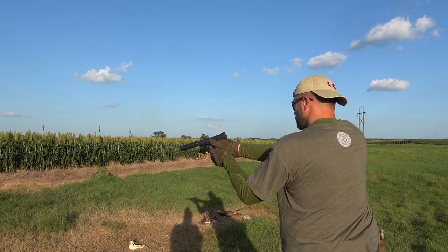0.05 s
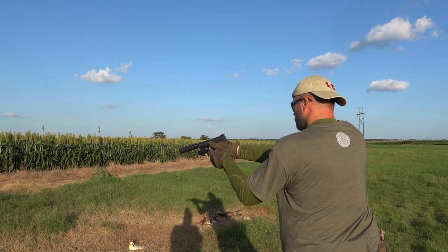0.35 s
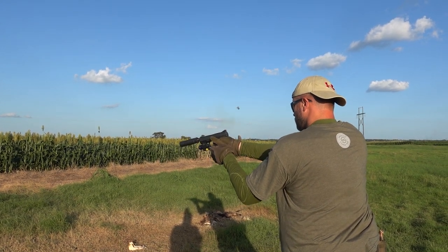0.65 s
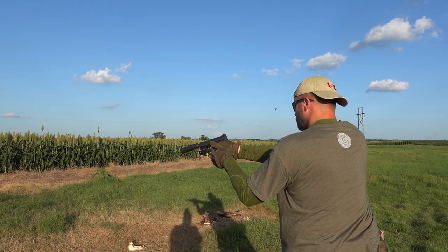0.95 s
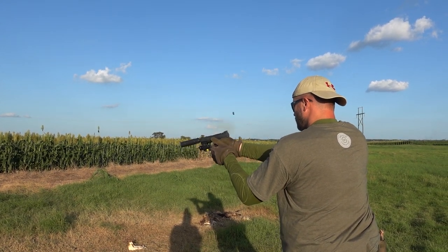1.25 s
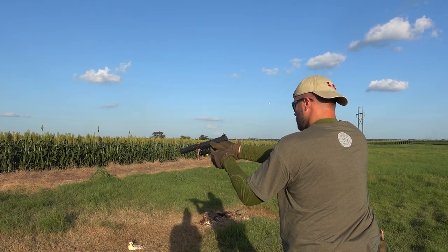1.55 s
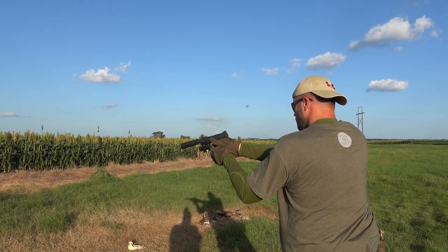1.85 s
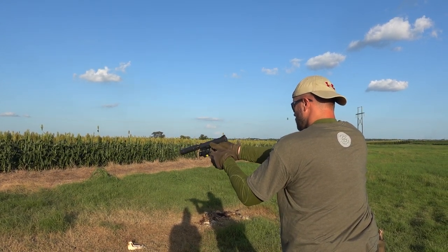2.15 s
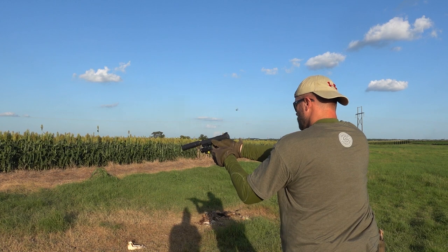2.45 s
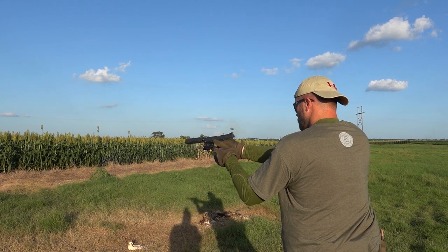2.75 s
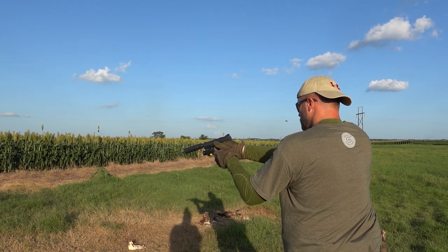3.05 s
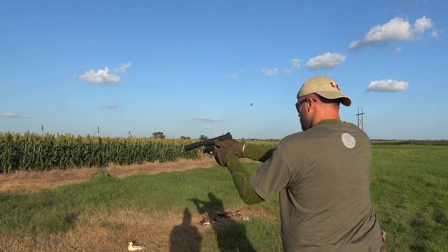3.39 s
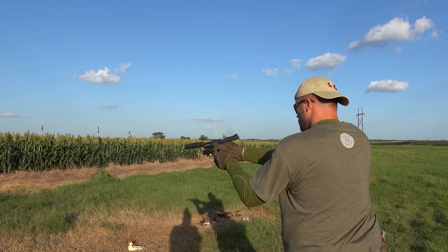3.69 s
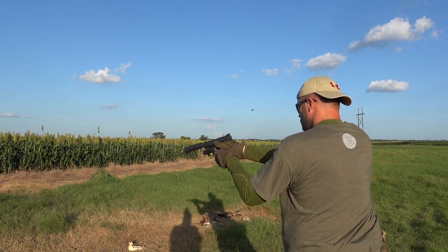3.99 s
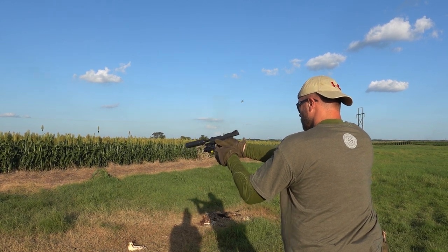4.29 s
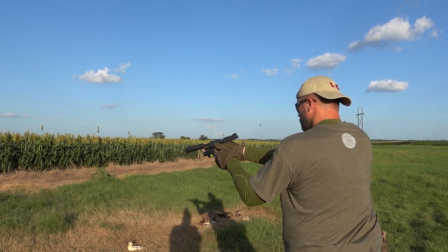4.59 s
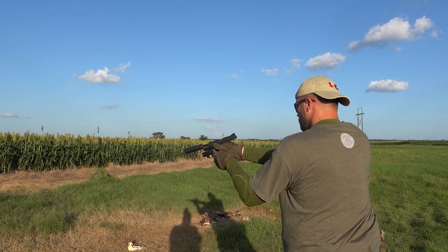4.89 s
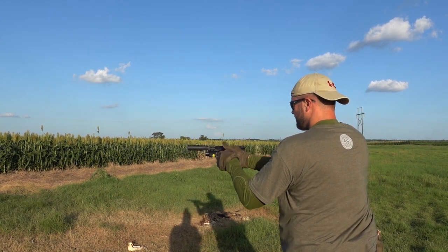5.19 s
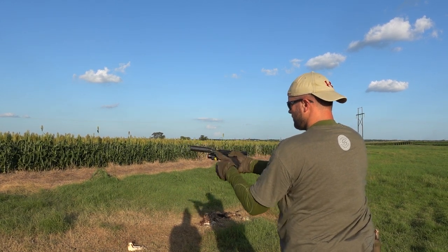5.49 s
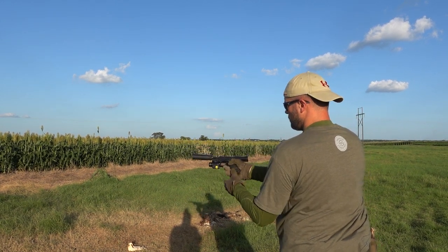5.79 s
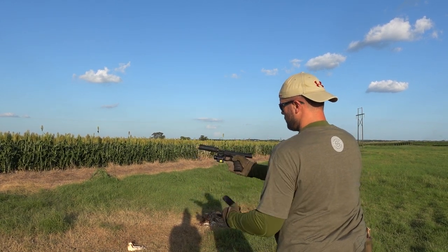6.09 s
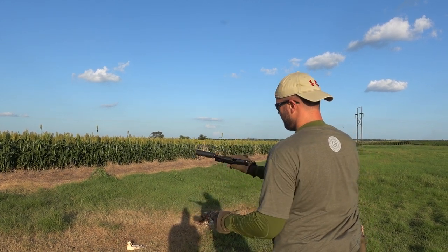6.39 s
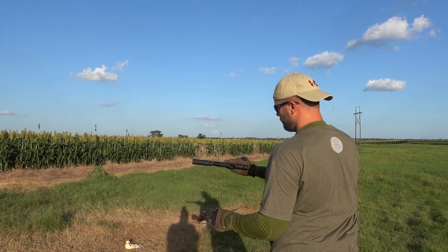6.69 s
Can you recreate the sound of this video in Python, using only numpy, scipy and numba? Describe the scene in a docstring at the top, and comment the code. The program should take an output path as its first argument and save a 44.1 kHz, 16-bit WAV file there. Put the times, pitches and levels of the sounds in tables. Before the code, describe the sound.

A suppressed pistol fires eight quick shots in an open field, each echoing, followed by handling clicks, birds and crickets.

```python
"""A suppressed pistol fires eight shots beside a cornfield, close to a mono microphone, then is handled.
Each blast overloads the microphone and the slide cycles. The rows of corn return a pitched, falling
echo and the far edge of the field a late hiss; an earlier shot's echo is still dying at the start.
Wind rumbles on the microphone, bush crickets chirp near and far, and birds whistle across the field."""
import sys
import numpy as np
from scipy import signal
from scipy.fft import rfft, irfft, next_fast_len
from scipy.io import wavfile
from scipy.ndimage import uniform_filter1d
from numba import njit

SR = 44100
rng = np.random.default_rng(int(sys.argv[2]) if len(sys.argv) > 2 else 0)


def waveform_to_disk(signal):
    """Save audio, clipped to [-1, 1], as 16-bit WAV at the path in sys.argv[1]."""
    frames = np.transpose(np.atleast_2d(signal))
    scaled = np.clip(frames, -1, 1) * 32767
    samples = np.round(scaled).astype(np.int16)
    wavfile.write(sys.argv[1], SR, samples)


N = 297234
TIME = np.arange(N) / SR
AGE = TIME[:SR]  # the second that follows an event
CORN_DELAY_S = .0545  # out to the front row and back to the microphone


def undb(db):
    """Decibels to gain."""
    return 10 ** (np.asarray(db) / 20)

def unit(x):
    """Scale to rms 1."""
    return x / np.sqrt(np.mean(x ** 2))

def colour(x, spectrum):
    """Filter x by a spectrum of (freq_hz, gain_db) points, at rms 1."""
    hz, db = np.transpose(spectrum)
    size = next_fast_len(len(x))
    f = np.maximum(np.fft.rfftfreq(size, 1 / SR), 1)
    gain = undb(np.interp(np.log(f), np.log(hz), db))
    return unit(irfft(rfft(x, size) * gain, size)[:len(x)])

def noise(spectrum, size=SR):
    """Coloured noise of rms 1."""
    return colour(rng.standard_normal(size), spectrum)

def rattle(modes):
    """Dense contacts ringing resonances of (pitch_hz, width_hz, gain_db), at rms 1."""
    f = np.fft.rfftfreq(SR, 1 / SR)
    response = sum(undb(db) / (1 + 2j * (f - hz) / width) for hz, width, db in modes)
    return unit(irfft(rfft(rng.standard_normal(SR)) * response))

def burst(peak_s, rise_s, decay_s):
    """Envelope that grows to 1 at peak_s and dies away."""
    return np.exp(np.maximum(np.minimum((AGE - peak_s) / rise_s, (peak_s - AGE) / decay_s), -50))

def bump(t, centre, width):
    """A smooth hump of height 1."""
    return np.exp(-np.minimum(((t - centre) / width) ** 2, 50))

def walk(rate_hz):
    """Smooth random drift, spread near 1."""
    knots = rng.standard_normal(1024)
    return np.interp(TIME * rate_hz, np.arange(len(knots)), knots)

def add(out, start_s, x):
    """Mix x into out from start_s on."""
    i = int(round(start_s * SR))
    a, b = max(i, 0), min(i + len(x), len(out))
    out[a:b] += x[a - i:b - i]

@njit
def resonance(x, hz, width):
    """Band-pass whose centre moves every sample."""
    y, band_state, low_state = np.empty(len(x)), 0., 0.
    for i in range(len(x)):
        g, damping = np.tan(np.pi * hz[i] / SR), width / hz[i]
        band = (band_state + g * (x[i] - low_state)) / (1 + g * (g + damping))
        band_state, low_state = 2 * band - band_state, low_state + 2 * g * band
        y[i] = damping * band
    return y

def air(wind_db=14):
    """Gusts buffet the microphone over the faint hiss of the open field."""
    # spectra of the wind and the field: freq_hz, gain_db
    rumble = [(2, -39.5), (7, 8.5), (12, 6), (20, -2), (40, -21), (80, -29), (140, -34.5), (300, -56.5),
              (800, -66)]
    field = [(100, 3.5), (300, 3.5), (550, 3.5), (1000, 1.5), (2500, -2.5), (7000, -12), (9500, -3),
             (11500, -18.5), (14000, -1), (16000, -8.5)]
    # their rise and fall: time_s, gain_db
    gusts = [(0, -29.5), (.9, -28), (1.5, -28.5), (2.3, -31), (3.1, -29.5), (3.9, -26), (4.75, -37),
             (5.7, -32.5), (6.4, -29.5), (6.74, -36)]
    hush = [(0, -48.5), (4.3, -55.5), (4.9, -55.5), (5.6, -53.5), (6.74, -51)]
    wind = noise(rumble, N) * undb(wind_db + np.interp(TIME, *np.transpose(gusts)))
    wind = .35 * np.tanh(wind / .35)  # the breeze stays light
    hiss = noise(field, N) * undb(np.interp(TIME, *np.transpose(hush)) + .54 * walk(.62))
    return wind + hiss

def chirp(hz, length_s, stroke_hz=140, sweep=.017, rasp=.0462):
    """A cricket's train of wing strokes, each a short, rough, falling tone."""
    t = AGE[:int(length_s * SR)]
    stroke = t * stroke_hz % 1
    pitch = hz * (1 + sweep * (.5 - stroke) + rasp * rng.standard_normal(len(t)))
    envelope = np.sin(np.pi * stroke) * signal.windows.tukey(len(t), .4)
    return envelope * np.sin(2 * np.pi * np.cumsum(pitch) / SR)

def crickets(near_db=-44, tiring_db_per_s=-.94, chorus_db=-53, fade_db_per_s=-2.4):
    """One bush cricket near the microphone, two further off, and a fading hiss of distant ones."""
    # bouts of the nearest: start_s, end_s, period_s
    bouts = [(.225, 4.5, .156), (4.69, 5.25, .166), (5.46, 6.72, .154)]
    chorus = noise([(10000, -29.5), (12500, -8), (14200, -2.5), (16000, -8.5)], N)
    out = chorus * undb(chorus_db + fade_db_per_s * TIME)
    for first, last, period_s in bouts:
        for start in np.arange(first, last, period_s):
            add(out, start, undb(near_db + tiring_db_per_s * start) * chirp(hz=9620, length_s=.053))
    for hz, period_s in [(10350, .185), (9350, .16)]:
        for start in np.cumsum(period_s * (1 + .063 * rng.standard_normal(48))):
            add(out, min(start, TIME[-1]), undb(-54) * chirp(hz, length_s=.055))
    return out

def birds(settle=3.2, waver_db=1.5, wet_db=-13, ring_s=.088):
    """Pure whistles that glide, mostly down, and level off, ringing on a little across the field."""
    # calls: start_s, length_s, first_hz, last_hz, level_db
    whistles = [(4.659, 0.14, 5200, 5270, -54), (4.836, 0.2, 4560, 3780, -39.5),
                (5.406, 0.11, 5500, 4900, -54), (5.52, 0.093, 5270, 4750, -62),
                (6.025, 0.19, 5120, 5200, -56), (6.152, 0.27, 4780, 3664, -38),
                (6.263, 0.09, 5540, 5430, -40.5), (6.33, .06, 5350, 4700, -58),
                (6.376, 0.22, 4880, 3680, -35.5), (6.63, 0.095, 4430, 3900, -57)]
    out = np.zeros(N)
    for start, length, first_hz, last_hz, db in whistles:
        progress = np.linspace(0, 1, int(length * SR))
        hz = last_hz + (first_hz - last_hz) * (1 - progress) ** settle
        tone = np.sin(2 * np.pi * np.cumsum(hz) / SR)
        add(out, start, undb(db) * np.sin(np.pi * progress) ** 2 * tone)
    tail = rng.standard_normal(SR) * np.exp(-AGE / ring_s)
    reverb = signal.fftconvolve(out, tail / np.linalg.norm(tail))[:N]
    return out * undb(waver_db * walk(40)) + undb(wet_db) * reverb

def far_edge(db=-31.5, delay_s=.3615, beyond_db=-53, beyond_s=.49, sizzle_hz=7000):
    """The far edge of the field returns a late, sizzling hiss; a weaker return comes from beyond."""
    sizzle = undb(-10) * rattle([(sizzle_hz * rng.uniform(.92, 1.08), 450, 0)])
    # spectrum of the distant echo: freq_hz, gain_db
    hiss = [(300, -35.5), (800, -3.5), (2000, -4.5), (4000, -3), (5600, 2.5), (7200, -0.5), (8300, -6),
            (12000, -12.5), (16000, -33.5)]
    edge = undb(db) * burst(delay_s, .064, .024) * bump(AGE, delay_s, .062)
    beyond = undb(beyond_db) * burst(beyond_s, .025, .04)
    return (noise(hiss) + sizzle) * (edge + beyond)

def sustain(db, swell_db, release_s, tail_db, tail_s, hold_s=.073, attack_s=.003):
    """Envelope of the corn's echo: it swells as more rows answer, then dies into a faint tail."""
    late = np.maximum(AGE - CORN_DELAY_S, 0)
    attack = np.clip(1 + (AGE - CORN_DELAY_S) / attack_s, 0, 1) ** 2
    swell = undb(db + swell_db * np.minimum(late / hold_s - 1, 0))
    release = np.exp(-np.maximum(late - hold_s, 0) / release_s)
    return attack * np.hypot(swell * release, undb(tail_db) * np.exp(-late / tail_s))

def foliage(glint, air_hz=7000, dulling_s=.22, ground_gain=.38, ground_lag_s=.00114):
    """Hissing echo of near and far leaves; they sway, so it is new for each shot."""
    # spectrum off the leaves: freq_hz, gain_db
    hiss = [(200, -18.5), (700, -7.5), (1500, 1), (2200, -5), (3000, -3.5), (3700, -3), (5200, 0.5),
            (6900, -4.5), (8500, -2.5), (11000, -12.5), (15500, -15.5)]
    leaves = noise(hiss)
    # a second path by way of the ground combs the spectrum; its lag shrinks with distance
    lag = ground_lag_s * rng.uniform(.73, 1.4) * CORN_DELAY_S / np.maximum(AGE, CORN_DELAY_S)
    leaves = unit(leaves + ground_gain * np.interp(AGE - lag, AGE, leaves))
    # air takes the top off the longer paths
    dull = signal.sosfilt(signal.butter(2, air_hz, fs=SR, output="sos"), noise(hiss))
    bright = bump(AGE, 0, dulling_s)
    leaves = np.sqrt(bright) * leaves + np.sqrt(1 - bright) * dull
    front_row = undb(-8) * burst(CORN_DELAY_S, .001, .0035)
    lone_reflector = undb(-27) * burst(.214, .0012, .00093)
    rows = sustain(db=-20, swell_db=4.5, release_s=.066, tail_db=-23, tail_s=.12)
    return glint * leaves * (front_row + rows + lone_reflector)

def stalk_echoes(edge_m=8.75, row_gap_m=.962, stalk_gap_m=.185, stray_m=.028, row_loss_db=-.5):
    """One reflection per stalk: even rows buzz near 180 Hz, even stalks whistle down toward 900 Hz."""
    row, stalk = np.mgrid[:40, :700]
    chance = rng.standard_normal((3,) + row.shape)
    across = edge_m + row * row_gap_m + stray_m * chance[0]
    along = (stalk - 12 + rng.random((len(row), 1))) * stalk_gap_m + stray_m * chance[1]
    distance = np.hypot(across, along)
    strength = undb(row_loss_db * row) * (1 + .49 * chance[2]) / distance ** 2
    arrival = (.003 + 2 * distance / 345) * SR  # out and back at 345 m/s
    return np.bincount(arrival.astype(int).ravel(), strength.ravel(), SR)[:SR]

def corn(whistle_db=9, first_hz=2300., last_hz=800., fall_s=.028, whistle_s=.085):
    """Echo of the stalks; the front rows whistle downward as the sound grazes along them."""
    # spectrum off the stalks: freq_hz, gain_db
    spectrum = [(100, -3.5), (180, -8.5), (270, -6), (360, -8), (450, -6.5), (560, 0.5), (800, 3.5),
                (1400, 3.5), (2100, -6.5), (3200, -11), (8000, -48)]
    stalks = colour(stalk_echoes(), spectrum)
    late = np.maximum(AGE - CORN_DELAY_S, 0)
    whistle_hz = last_hz + (first_hz - last_hz) * np.exp(-late / fall_s)
    whistle = resonance(stalks, whistle_hz, width=330.)
    stalks += undb(whistle_db) * bump(late ** 2, 0, whistle_s ** 2) * whistle
    levelled = stalks / np.sqrt(np.abs(uniform_filter1d(stalks ** 2, size=900)) + 1e-12)
    front_row = undb(-15) * burst(CORN_DELAY_S, .001, .0026)
    rows = sustain(db=-14, swell_db=6.5, release_s=.041, tail_db=-34, tail_s=.18)
    far_slap = noise(spectrum) * undb(-35) * burst(.359, .0029, .01)
    return levelled * (front_row + rows) + far_slap

def click(steel_db, frame_db, decay_s, ring_db=-24, ring_s=.019):
    """A small part strikes home and rings the gun's steel and frame."""
    # resonances: pitch_hz, width_hz, gain_db
    steel = [(1800, 180, -4.5), (2440, 230, 20), (2900, 490, 19), (4700, 1800, 13), (5540, 280, -6),
             (8000, 700, -33), (8980, 900, -50)]
    frame = [(575, 83, -11.5), (1120, 490, 24), (1600, 200, 4)]
    envelope = burst(.00038, .00054, decay_s) + undb(ring_db) * burst(.00053, .0003, ring_s)
    return envelope * (undb(steel_db) * rattle(steel) + undb(frame_db) * rattle(frame))

def handling(grip_hz=540, rough_db=4, fidget_from_s=4.65, fidget_to_s=6.5, ticks_per_s=4):
    """Close by, the magazine scrapes out, small parts click, and hands knock and shift on the gun."""
    # a glove rubs the grip, the magazine slides out and comes free: start_s, length_s, level_db
    scrapes = [(5.477, 0.12, -55), (5.877, 0.17, -44.5), (6.126, 0.034, -48), (6.437, 0.036, -49)]
    # spectrum of the rubbing: freq_hz, gain_db
    friction = [(300, -11), (900, -10), (3000, -2), (8000, -3), (11000, -15), (16000, -12.5)]
    # trigger reset, catch and magazine: start_s, steel_db, frame_db, decay_s
    clicks = [(0.2911, -31, -13.5, 0.0019), (1.2164, -38, -13, 0.0024), (4.7957, -32, -24.5, 0.0027),
              (5.0406, -45, -60, 0.0014), (5.0655, -45, -64, 0.0024), (5.1517, -42, -45, .009),
              (5.6507, -47, -66, 0.0026), (5.8846, -22, -27, 0.0064), (5.962, -38, -33, 0.0018),
              (6.021, -52, -31, .0034), (6.356, -34, -48, .0014), (6.393, -38.5, -37, 0.0013)]
    # dull knocks on the grip: start_s, level_db
    knocks = [(4.188, -44), (4.636, -55), (4.727, -48), (5.153, -35), (5.887, -34), (6.023, -61)]
    rubbing = np.zeros(N)
    for start, length, db in scrapes:
        add(rubbing, start, undb(db) * signal.windows.tukey(int(length * SR), .3))
    out = rubbing * noise(friction, N) * undb(rough_db * walk(140))
    for start, steel_db, frame_db, decay_s in clicks:
        add(out, start, click(steel_db, frame_db, decay_s))
    for start, db in knocks:
        add(out, start, undb(db) * burst(.0081, .002, .013) * rattle([(grip_hz, 160, 0)]))
    ticks = int(ticks_per_s * (fidget_to_s - fidget_from_s))
    for start in rng.uniform(fidget_from_s, fidget_to_s, ticks):
        add(out, start, click(steel_db=-49, frame_db=-57, decay_s=.0022))
    return out

def trigger(frame_db=-5, slack_db=-8, slack_s=.016):
    """Each pull takes up the slack with a faint tick, then the sear clicks just before the shot."""
    # sear clicks: start_s, level_db
    pulls = [(.624, -18.5), (1.2314, -26), (1.802, -21.5), (2.276, -34), (2.7863, -26.5), (3.274, -30),
             (3.7522, -24), (4.208, -23.5)]
    out = np.zeros(N)
    for start, db in pulls:
        add(out, start - slack_s, click(db + slack_db, db + slack_db + frame_db, decay_s=.00076))
        add(out, start, click(db, db + frame_db, decay_s=.00059))
    return out

def shot(blast_db, wave_db, gas_db, stop_db, shut_db, blast_s=.0033, suction_s=.007, gas_s=.01):
    """Striker, blast, gas leaving the suppressor, the slide's rear stop and closing, grass scatter."""
    # spectra of muzzle blast, gas and slide: freq_hz, gain_db
    muzzle = [(100, -28.5), (400, 3.5), (1200, 7), (2500, 3), (6000, 4.5), (9000, 6), (15000, -13.5)]
    vent = [(150, 0.5), (600, -0.5), (1500, 0.5), (2500, -5), (5000, -2), (8500, -3), (11000, -10),
            (16000, -6)]
    slide = [(200, -2.5), (700, -0.5), (2500, 5.5), (4500, 10), (7000, -1.5), (15000, -5.5)]
    # resonances of the closing slide: pitch_hz, width_hz, gain_db
    slide_ring = [(4360, 3400, -24), (6240, 580, -17.5), (8100, 330, -5), (8750, 450, -33),
                  (14800, 1600, -21.5)]
    striker = noise(slide) * undb(-9.5) * burst(.0012, .00024, .0013)
    blast = noise(muzzle) * undb(blast_db + 15) * burst(blast_s, .00015, .0015)
    gas = noise(vent) * undb(gas_db - 5.5) * burst(gas_s, .002, .0085)
    stop = noise(slide) * undb(stop_db - 1) * burst(.0262, .0008, .0011)
    shut = rattle(slide_ring) * undb(shut_db) * burst(.0467, .0005, .0013)
    grass = noise(vent) * undb(-19.5) * burst(.035, .014, .041)
    # the blast's pressure falls into suction, then rebounds
    pressure = .7 * bump(AGE, blast_s, .001) - 1.8 * bump(AGE, suction_s, .0018)
    pressure += 1.2 * bump(AGE, gas_s, .0012)
    # a strong wave also leaves the suppressor with a hollow thump
    thump = rattle([(310, 130, 0)]) * undb(2 * wave_db - 5) * burst(suction_s, .0012, .0065)
    return striker + blast + gas + stop + shut + grass + thump + undb(wave_db) * pressure

def pistol(near_echo_s=.11, far_echo_s=.2, puff_half_width_s=.009):
    """Close shots and their echoes, which shift from the far rows to the near as the firing goes on."""
    # shots, each part's level relative; the slide stays open after the last round:
    # start_s, blast_db, wave_db, gas_db, stop_db, shut_db, near_db, far_db
    shots = [(-.286, 0, 0, 0, 0, 0, 0, 7), (.642, 5.5, -5, 2, 6, -2, 1, 6),
             (1.264, 4, -5.5, 3.5, 7.5, -9.5, -1, 4), (1.8215, 11.5, -7.5, 1, 5.5, -2, 1, 1.5),
             (2.3205, 4, -15, 4.5, 1.5, 3.5, 0.5, -0.5), (2.8065, 15, -4.5, 1, 2.5, -4.5, -2, -3),
             (3.2887, 3, -11.5, 2, 3, -1.5, 1.5, -2), (3.7631, 1.5, -2.5, 3.5, 4, 2, 0.5, -2.5),
             (4.2209, 0.5, -4.5, 3, 2, -54, 1, -3)]
    # puffs of air on the microphone, the strongest choking it: time_s, pressure_full_scale
    puffs = [(.658, .6), (1.302, .9), (1.853, .35), (2.338, -1.2), (2.8435, 2.6), (3.316, .35)]
    out, stalks = np.zeros(N), corn()
    glint = unit(undb(2.2 * walk(600)[:SR]))  # a few broad leaves face the gun and stand out
    for start, *parts_db, near_db, far_db in shots:
        echo_gain = undb(np.interp(AGE, [near_echo_s, far_echo_s], [near_db, far_db]))
        echo = echo_gain * (stalks + foliage(glint) + far_edge())
        add(out, start, shot(*parts_db) + echo)
    return out + sum(pressure * bump(TIME, s, puff_half_width_s) for s, pressure in puffs)

def scene():
    """Gun and field reach one microphone, the same on both channels."""
    mono = pistol() + trigger() + handling() + birds() + crickets() + air()
    return np.array([mono, mono])

def record(dry):
    """The preamplifier saturates and softens the top; the converter clips and cuts the highest treble."""
    rail, soften_hz, coupling_hz, top_hz = .78, 12500, 28, 15750
    saturated = dry / (1 + (dry / rail) ** 8) ** (1 / 8)
    softened = signal.sosfilt(signal.butter(1, soften_hz, fs=SR, output="sos"), saturated)
    # the coupling capacitor lets held pressure sag
    coupled = signal.sosfilt(signal.butter(1, coupling_hz, "high", fs=SR, output="sos"), softened)
    clipped = np.clip(coupled, -1, 1)
    return signal.sosfilt(signal.ellip(10, .1, 70, top_hz, fs=SR, output="sos"), clipped)


dry = scene()
out = record(dry)
waveform_to_disk(out)
```